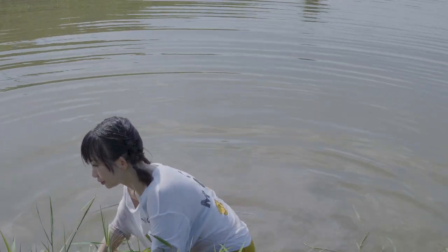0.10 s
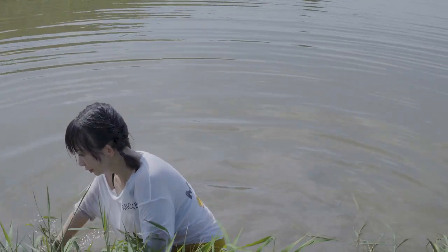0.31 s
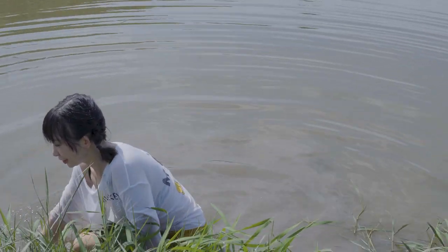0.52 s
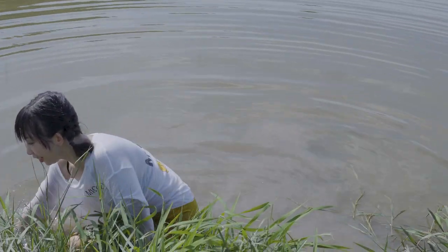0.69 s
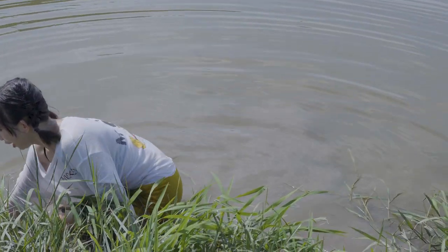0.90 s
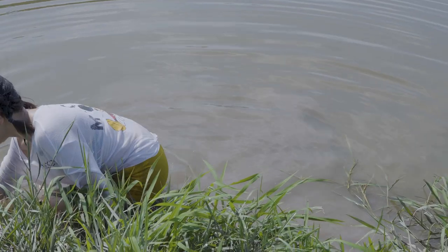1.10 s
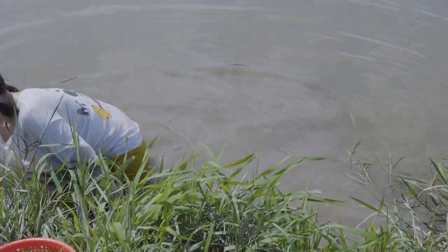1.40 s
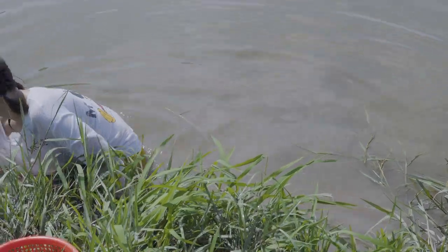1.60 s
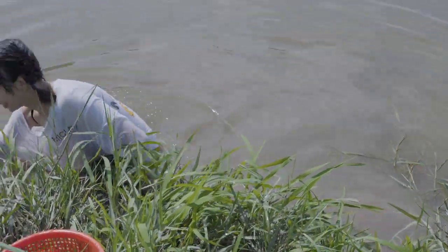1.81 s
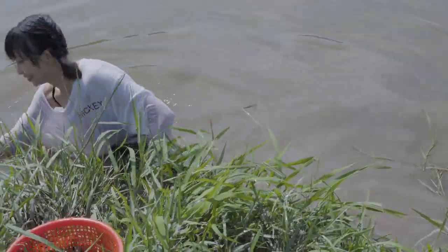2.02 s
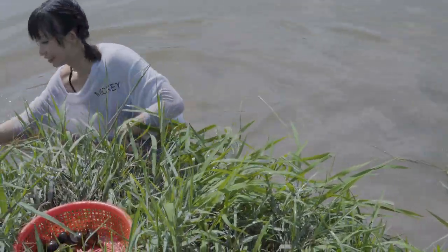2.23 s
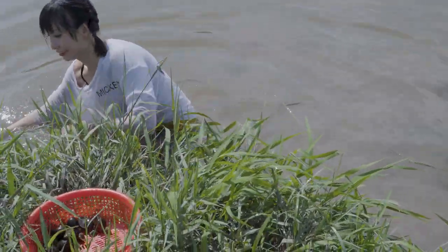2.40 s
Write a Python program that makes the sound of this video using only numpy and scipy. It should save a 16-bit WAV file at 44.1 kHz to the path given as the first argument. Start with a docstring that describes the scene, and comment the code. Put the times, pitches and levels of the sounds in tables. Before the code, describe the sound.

Shallow water splashing as a person gropes in a pond, two strong sloshes thinning to single plops

```python
"""Hands in a muddy pond

Hands grope through a shallow muddy pond: two sloshing sweeps, a deep glug, then single plops and drips.
Trapped air rings as decaying sine bubbles, most rising in pitch; stirred water is a swarm of them in noise.
Slaps are short noise cracks, spray is tiny droplets in a hiss, and a grassy bank scatters the water's sound.
Light air rumbles on the microphone, which takes two soft bumps."""
import sys
import numpy as np
from scipy import signal
from scipy.fft import rfft, irfft, next_fast_len
from scipy.io import wavfile
from scipy.ndimage import map_coordinates

SR = 44100
rng = np.random.default_rng(int(sys.argv[2]) if len(sys.argv) > 2 else 0)


def digitize_waveform(pressure):
    """Quantize a signal to 16-bit integers and store it at the path in sys.argv[1].

    Rows of a 2-D input are taken as channels; values are limited to [-1, 1].
    """
    field = np.atleast_2d(pressure).T
    bounded = np.clip(field, -1, 1)
    quanta = np.round(bounded * 32767).astype(np.int16)
    wavfile.write(sys.argv[1], SR, quanta)


N = 112455  # length [samples]

# spectrum of droplets and mist: (frequency [Hz], level [dB])
SPRAY_COLOUR = [(1500, 1), (4500, -0.5), (8000, -2), (13000, -2), (15500, -18)]


def amp(db):
    """Decibels to gain."""
    return 10 ** (np.asarray(db) / 20)


def unit(x):
    """Scale to rms 1."""
    return x / np.sqrt(np.mean(x ** 2) + 1e-20)


def level(rows):
    """Gain per sample, interpolated in dB between (time [s], level [dB]) points."""
    s, db = np.transpose(rows)
    return amp(np.interp(np.arange(N) / SR, s, db))


def filtered(x, response):
    """Multiply the spectrum of x by a response of frequency, padded against wrap-around."""
    m = next_fast_len(N + SR // 2)
    hz = np.fft.rfftfreq(m, 1 / SR)
    return irfft(rfft(x, m) * response(hz), m)[:N]


def coloured(x, points):
    """Shape x by (frequency [Hz], level [dB]) points on a log-frequency axis, at rms 1."""
    f, db = np.transpose(points)

    def response(hz):
        return amp(np.interp(np.log(hz + 1), np.log(f + 1), db))

    return unit(filtered(x, response))


def noise(points):
    """Coloured noise of rms 1."""
    return coloured(rng.standard_normal(N), points)


def swell(t, centre, half):
    """A bell-shaped rise and fall, down to 1/e at half seconds either side of the centre."""
    return np.exp(-((t - centre) / half) ** 2)


def decay(t, t60):
    """Exponential dying away by 60 dB in t60 seconds."""
    return np.exp(-np.log(1000) * t / t60)


def add(out, s, sound):
    """Mix a sound in at time s."""
    i = max(round(s * SR), 0)
    out[i:i + len(sound)] += sound[:max(len(out) - i, 0)]


def wobble(rate):
    """A smooth random curve, rate knots a second."""
    knots = rng.standard_normal(int(N * rate / SR) + 4)
    return map_coordinates(knots, [np.arange(N) * rate / SR])


def ring(t, hz, t60, rise, onset_cycles=1.52):
    """A bubble with an envelope of peak 1: it swells within a couple of cycles, glides, and dies or bursts."""
    burst_rise = 1  # the bubble bursts at the surface about when its pitch has moved by this share
    burst = np.square(np.square(rise * t / burst_rise))
    fade = np.minimum(np.log(1000) * t / t60 + burst, 20)
    onset = 1 - np.exp(-np.minimum(np.square(t * hz / onset_cycles), 20))
    envelope = onset * np.exp(-fade)
    envelope = envelope / envelope.max(axis=-1, keepdims=True)
    # the pitch moves in a straight line: hz * (1 + rise * t)
    return envelope * np.sin(2 * np.pi * hz * (t + rise * t * t / 2))


def swarm(per_s, centre_hz, octaves, cycles, glide, scatter_db, size):
    """A steady stream of random bubbles, each at most size samples long."""
    total = int(per_s * N / SR)
    when, pitch, life, strength, bend = rng.random((total, 5)).T[:, :, None]
    # pitches gather round the centre and reach at most the given octaves either side
    hz = centre_hz * 2 ** (octaves * np.arcsin(2 * pitch - 1) * 2 / np.pi)
    t60 = cycles * 2 ** (2 * life - 1) / hz
    n = np.arange(size)
    grains = amp(scatter_db * strength ** 2) * ring(n / SR, hz, t60, glide * bend ** 2 / t60)
    starts = ((np.arange(total)[:, None] + 2 * when) * SR / per_s).astype(int)
    return np.bincount((starts + n).ravel(), grains.ravel(), N)[:N]


def slosh():
    """Stirred water: a swarm of small ringing bubbles on a soft noise wash."""
    # how hard the hands stir: (time [s], level [dB])
    stir = [(0, -49), (.26, -60.5), (.32, -31.5), (.375, -17.5), (.40, -32.5), (.52, -22), (.645, -37.5),
            (.705, -26.5), (.80, -22), (.93, -37), (1.08, -36), (1.18, -34.5), (1.28, -46), (1.365, -27),
            (1.42, -34.5), (1.64, -45.5), (1.74, -52.5), (1.92, -50.5), (2.02, -49.5), (2.09, -36),
            (2.19, -37), (2.30, -37.5), (2.36, -53.5), (2.55, -50.5)]
    # spectra of bubbles and wash: (frequency [Hz], level [dB])
    bubble_colour = [(330, -22), (620, -2), (1200, 2), (3000, 5.5), (4500, -3)]
    wash_colour = [(350, -23), (650, -12), (1300, -1.5), (3000, 7.5), (4200, -7.5), (15000, -59)]
    wash_db = -10  # against the bubbles
    bubbles = swarm(per_s=900, centre_hz=1505.0, octaves=1.706, cycles=21.3, glide=0.24,
                    scatter_db=16.0, size=1600)
    return level(stir) * (coloured(bubbles, bubble_colour) + amp(wash_db) * noise(wash_colour))


def plops():
    """The large bubbles one by one, each a decaying sine whose pitch glides."""
    # (start [s], pitch [Hz], peak [dB], t60 [s], pitch rise [share of the pitch per s])
    large_bubbles = [(0.277, 1820, -32, 0.043, 2), (0.325, 1128, -16.5, 0.054, 34),
                     (0.359, 2660, -12.5, 0.014, 3), (0.371, 4490, -11, 0.0058, -1),
                     (0.376, 2100, -9, 0.0046, 0), (0.38, 777, -12, 0.013, 64),
                     (0.44, 977, -12.5, 0.036, 58), (0.479, 1780, -7, 0.0052, 55),
                     (0.488, 510, -16, 0.073, 19.5), (0.508, 1000, -10.5, 0.021, 10),
                     (0.511, 1941, -11.5, 0.056, 35), (0.522, 556, -14, 0.03, 37.5),
                     (0.68, 800, -13.5, 0.026, 10), (0.704, 355, -21, 0.091, 0.5),
                     (0.712, 2060, -12, 0.023, 6), (0.785, 950, -0.5, 0.01, 31),
                     (0.789, 2900, -8, 0.01, -11), (0.798, 606, -16.5, 0.078, 5),
                     (0.88, 1273, -18.5, 0.11, 13.5), (0.963, 1544, -16.5, 0.067, 24.5),
                     (0.984, 2660, -14, 0.0084, 18), (1.124, 1560, -12.5, 0.047, 13),
                     (1.237, 1910, -21.5, 0.044, -0.5), (1.333, 830, -12.5, 0.15, 2.5),
                     (1.348, 2798, -6, 0.016, 5), (1.369, 672, -19, 0.061, -7.5),
                     (1.421, 1656, -18, 0.046, 5.5), (1.481, 760, -23, 0.19, -1),
                     (1.539, 1814, -21, 0.043, 4.5), (1.559, 1197, -24, 0.13, 48.5),
                     (1.619, 443, -28.5, 0.11, -0.5), (1.658, 1380, -22.5, 0.036, 19),
                     (1.826, 797, -28.5, 0.11, 1), (1.911, 1017, -10, 0.017, -14),
                     (1.956, 750, -27.5, 0.18, 5), (2.142, 1420, -9.5, 0.014, 16),
                     (2.156, 1740, -5, 0.0015, 2), (2.183, 1250, -17.5, 0.049, 4.5),
                     (2.281, 713, -16, 0.033, -1.5), (2.393, 3300, -19.5, 0.0044, -10),
                     (2.498, 913, -30, 0.41, 33.5), (2.5, 2065, -23, 0.033, 16)]
    out, t = np.zeros(N), np.arange(SR // 8) / SR
    for s, hz, db, t60, rise in large_bubbles:
        add(out, s, amp(db) * ring(t, hz, t60, rise))
    return out


def slaps():
    """Short wet cracks where water meets water, each with a puff of droplets."""
    # (start [s], body level before the envelope [dB], treble over body [dB])
    hits = [(0.372, -26, -5), (0.6054, -18.5, -6), (0.677, -21.5, 3.5), (0.7, -8.5, -12), (0.732, -14, -5),
            (0.785, -6, -22), (1.009, -14, -17), (1.346, -22, -0.5), (1.912, -17.5, -8), (2.065, -12, -18),
            (2.164, -26.5, 5), (2.502, -25.5, -8)]
    # spectrum of the body: (frequency [Hz], level [dB])
    body_colour = [(150, -22.5), (700, -4.5), (3200, -2.5), (4300, -22), (9000, -25.5)]
    rise_s, t60_s = 0.0019, 0.023
    out, t = np.zeros(N), np.arange(N) / SR
    body, treble = noise(body_colour), droplets()
    for s, db, treble_db in hits:
        age = np.maximum(t - s, 0)
        envelope = (1 - np.exp(-age / rise_s)) * decay(age, t60_s)
        out += amp(db) * envelope * (body + amp(treble_db) * treble)
    return out


def glugs():
    """Large air pockets gulp shut: each throbs and sags in pitch, its overtones ragged as it breaks up."""
    # (start [s], starting pitch [Hz], fundamental [dB], gain of the overtones [dB])
    gulps = [(1.095, 377, -16.5, 0.5), (1.161, 445, -35, 7.5)]
    # balance of multiples 2 to 5 of the pitch: level [dB]
    partials_db = [-13, -3.5, -5, -16.5]
    length_s, rise_s, fall_s = 0.0496, 0.0078, 0.021  # the fall is the time per 20 dB after the length
    sag_hz, top_hz = 48.4, 2000  # overtones starting at or above top_hz are left out
    ragged_rad, flutter_per_s = .7, 240  # phase wander per multiple above the first; its knots a second
    out, t = np.zeros(N), np.arange(N) / SR
    for s, start_hz, db, overtone_db in gulps:
        age = np.maximum(t - s, 0)
        progress = np.minimum(age / length_s, 1)
        phase = 2 * np.pi * np.cumsum(start_hz - sag_hz * progress ** 2) / SR
        envelope = np.minimum(age / rise_s, 1) * amp(-20 * np.maximum(age - length_s, 0) / fall_s)
        overtones = np.zeros(N)
        for k, partial_db in enumerate(partials_db, 2):
            if k * start_hz < top_hz:
                wander = ragged_rad * (k - 1) * progress * wobble(flutter_per_s)
                overtones += amp(partial_db) * np.sin(k * phase + wander)
        out += amp(db) * envelope * (np.sin(phase) + amp(overtone_db) * overtones)
    return out


def fizz():
    """Dense crackle of tiny bubbles where the water tears."""
    # (centre [s], half length [s], level [dB])
    bursts = [(0.412, 0.035, -35), (0.714, 0.05, -32), (0.788, 0.012, -28)]
    t = np.arange(N) / SR
    crackle = swarm(per_s=1800, centre_hz=4740, octaves=0.7, cycles=11, glide=0.092,
                    scatter_db=18, size=256)
    return unit(crackle) * sum(amp(db) * swell(t, s, half) for s, half, db in bursts)


def droplets():
    """Tiny droplets ticking on the surface: a swarm of very short, high rings at rms 1."""
    ticks = swarm(per_s=2000, centre_hz=7950, octaves=1.12, cycles=12.6, glide=0.056,
                  scatter_db=27, size=256)
    return coloured(ticks, SPRAY_COLOUR)


def spray():
    """Thrown droplets in a fine mist of noise."""
    # how much water is in the air: (time [s], level [dB])
    thrown = [(0, -55), (.33, -54), (.39, -49.5), (.64, -43.5), (.74, -42), (.85, -46.5), (1.25, -48.5),
              (1.75, -58.5), (1.87, -47.5), (1.98, -58), (2.1, -47.5), (2.47, -57)]
    droplet_db = -1  # against the mist
    return level(thrown) * (amp(droplet_db) * droplets() + noise(SPRAY_COLOUR))


def swirls():
    """Dull swells of band-limited noise as an arm pushes through the water."""
    # (centre [s], level [dB])
    pushes = [(.41, -39.5), (0.591, -41), (2.12, -40)]
    half_s, centre_hz, width_octaves = 0.056, 416, 0.93
    t = np.arange(N) / SR

    def response(hz):
        return np.exp(-(np.log2((hz + 1) / centre_hz) / width_octaves) ** 2)

    band = unit(filtered(rng.standard_normal(N), response))
    return band * sum(amp(db) * swell(t, s, half_s) for s, db in pushes)


def bank(x):
    """A short diffuse answer from the grassy bank: x convolved with a decaying noise tail of energy 1."""
    rise_s, t60_s = 0.0019, 0.11
    t = np.arange(SR // 4) / SR
    tail = rng.standard_normal(len(t)) * decay(t, t60_s) * (1 - np.exp(-t / rise_s))
    return signal.fftconvolve(x, tail / np.linalg.norm(tail))[:N]


def microphone_air():
    """Steady outdoor rumble and hiss as noise, with two soft bumps as brief low sine swells."""
    # knocks on the microphone: (centre [s], frequency [Hz], half length [s], level [dB])
    knocks = [(0.256, 20, 0.039, -16), (1.858, 114, 0.005, -14)]
    # spectrum of the air: (frequency [Hz], level [dB])
    air_colour = [(25, 1.5), (60, -6), (300, -21), (1500, -41), (3000, -32.5), (4300, -35), (13000, -40.5),
                  (15500, -49)]
    air_db = -41
    t = np.arange(N) / SR
    out = amp(air_db) * noise(air_colour)
    for s, hz, half, db in knocks:
        out += amp(db) * swell(t, s, half) * np.sin(2 * np.pi * hz * (s - t))
    return out


def scene():
    """All the water, its scatter from the bank, and the air at the microphone."""
    bank_db = -10.5
    water = slosh() + plops() + slaps() + glugs() + fizz() + spray() + swirls()
    return (water + amp(bank_db) * bank(water) + microphone_air())[None]


def record(dry):
    """The recorder clips at full scale, then keeps nothing above its band limit."""
    top_hz = 15650
    return filtered(np.clip(dry[0], -1, 1), lambda hz: hz < top_hz)[None]


dry = scene()
out = record(dry)
digitize_waveform(out)
```